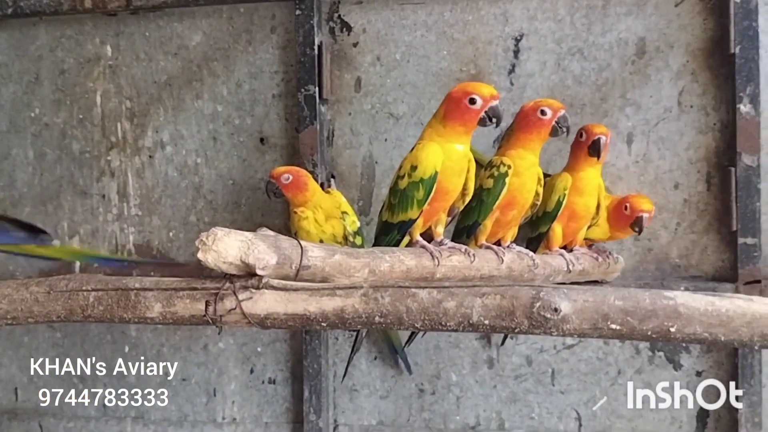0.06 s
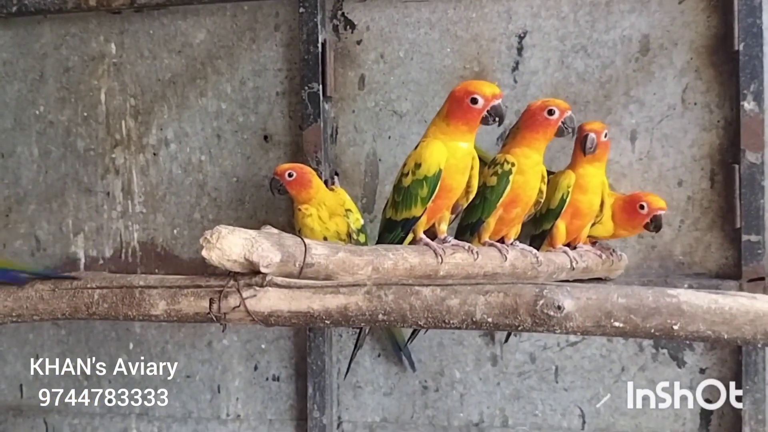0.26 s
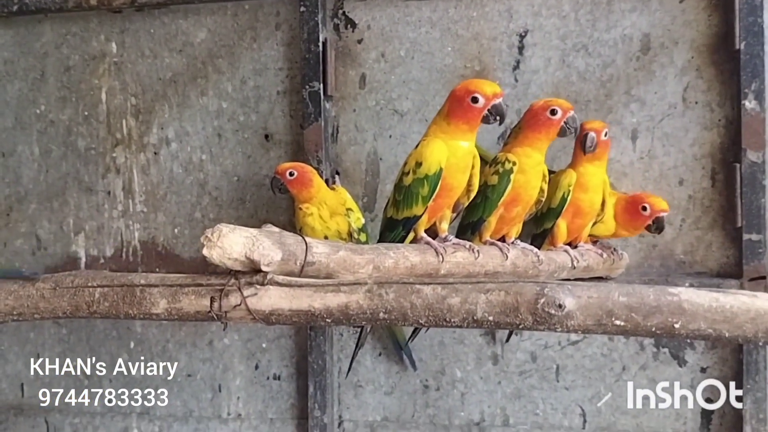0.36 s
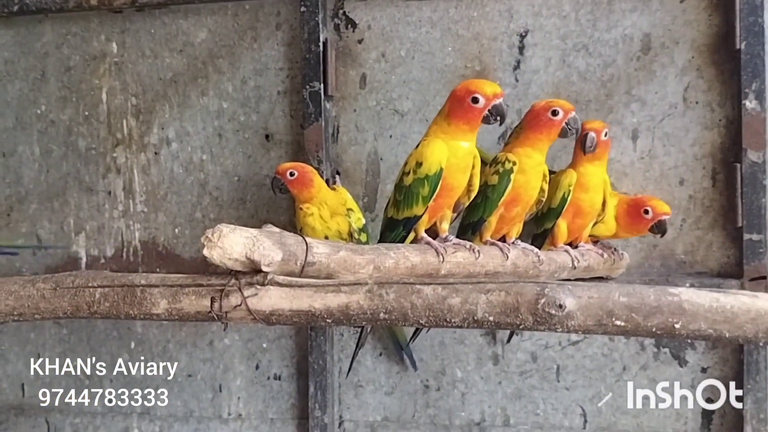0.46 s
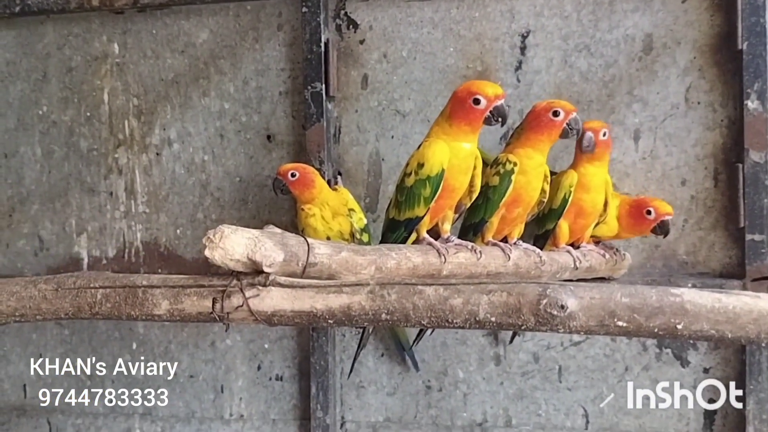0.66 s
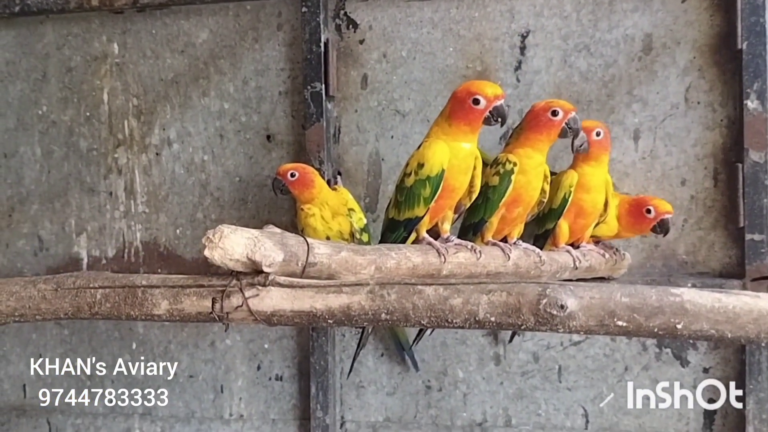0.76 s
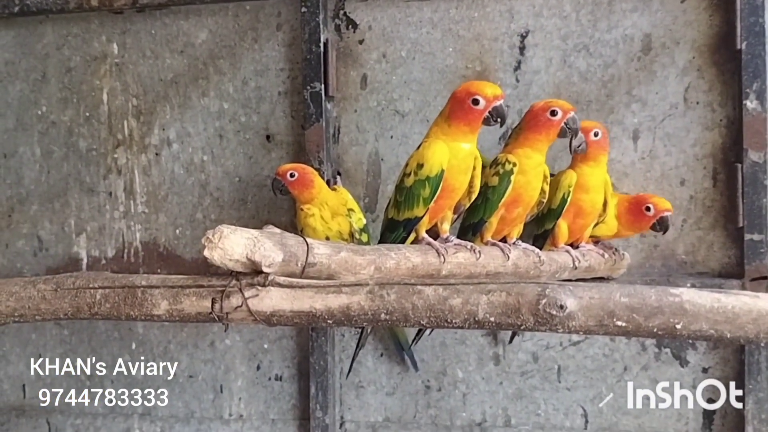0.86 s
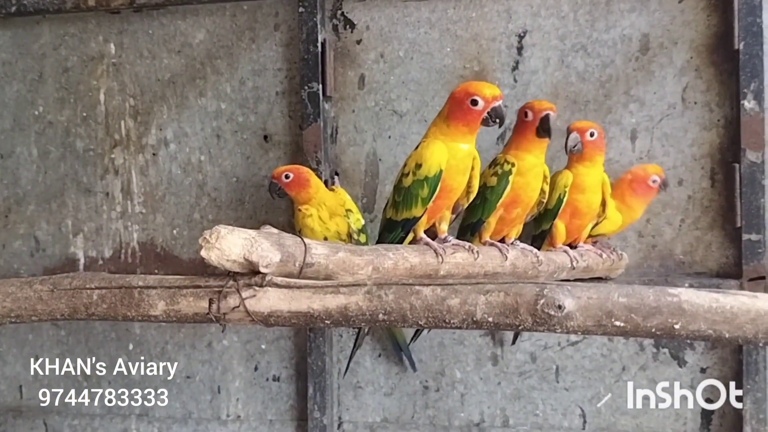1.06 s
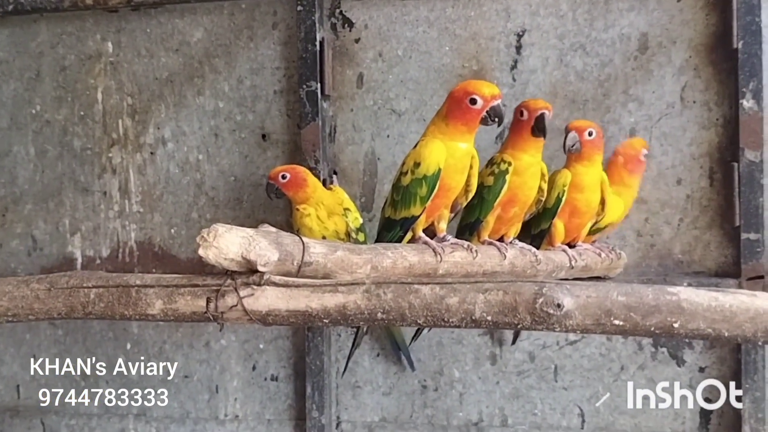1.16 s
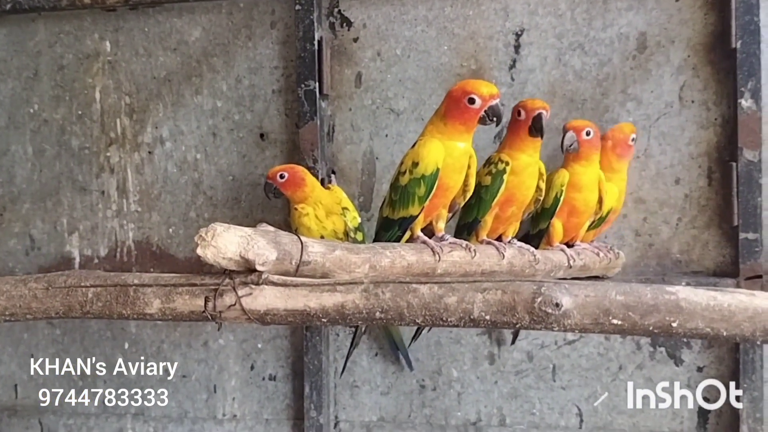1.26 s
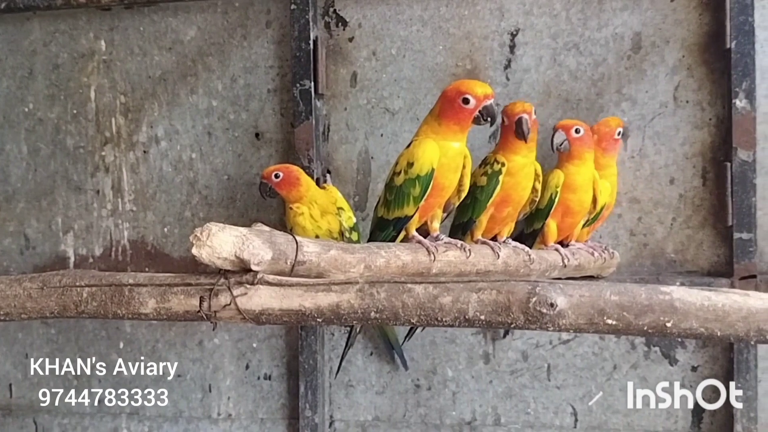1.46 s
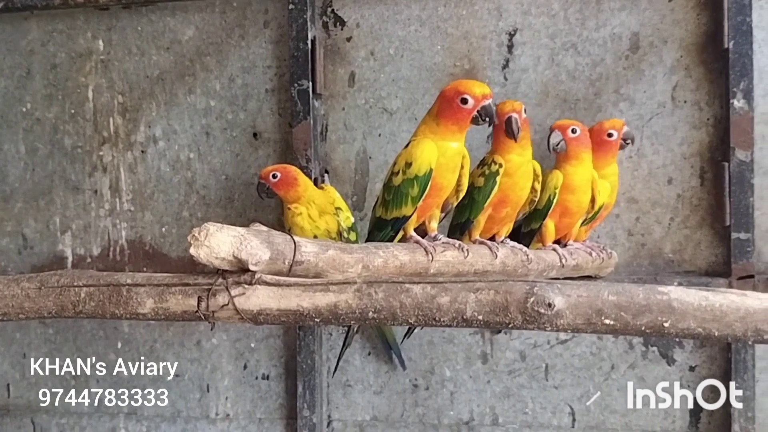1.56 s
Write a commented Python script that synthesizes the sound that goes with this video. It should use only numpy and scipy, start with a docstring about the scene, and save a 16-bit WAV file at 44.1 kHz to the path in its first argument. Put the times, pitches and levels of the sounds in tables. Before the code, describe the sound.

Small parrots call shrilly, one rasping into a piercing shriek, then trilling and chattering, walls ringing

```python
"""In a hard-walled aviary, parrots call: a harsh rasp breaks into a clear shriek, then come a trilled
screech and a short chatter. Birds farther off squawk at the start and towards the end.
Each voice is an unsteady reed-like tone with pulsed, raspy noise, shaped by the throat.
Noise bursts with a decay make the walls ring after every cry, over a low hum and filtered-noise rumble."""
import sys
import numpy as np
from scipy import signal
from scipy.fft import rfft, irfft, next_fast_len
from scipy.io import wavfile
from scipy.ndimage import uniform_filter1d, minimum_filter1d, map_coordinates

SR = 44100
rng = np.random.default_rng(int(sys.argv[2]) if len(sys.argv) > 2 else 0)


def put_to_file(sound):
    """Save the sound as 16-bit audio at rate SR, in the file named by the first command-line argument."""
    columns = np.atleast_2d(sound).T  # one column per channel
    safe = np.clip(columns, -1, 1)
    whole_steps = np.round(safe * 32767)
    wavfile.write(sys.argv[1], SR, whole_steps.astype(np.int16))


N = 72765

# Random turns a second of pitch, level, each harmonic, and the slower clumps and quaver
JITTER_RATE, GRIT_RATE, FUZZ_RATE, CLUMP_RATE = 800, 550, 450, 240
TOP_HZ = 15750  # upper limit of the harmonics and of the whole scene


def amp(db):
    """Decibels to gain."""
    return 10 ** (np.asarray(db) / 20)


def unit(x):
    """Scale to rms 1."""
    return x / np.sqrt(np.mean(x ** 2) + 1e-20)


def along(points, hz):
    """Read (Hz, value) points on a log frequency axis."""
    f, v = np.transpose(points)
    return np.interp(np.log(hz + 1), np.log(f + 1), v)


def clock():
    """Time of each sample in seconds."""
    return np.arange(N) / SR


def wobble(rate):
    """A smooth random curve, rate knots a second."""
    return map_coordinates(rng.standard_normal(N // 20), [clock() * rate], mode="wrap")


def filtered(x, response):
    """Filter x by a response given as a function of frequency."""
    m = next_fast_len(N + SR // 4)
    spectrum = rfft(x, m) * response(np.fft.rfftfreq(m, 1 / SR))
    return irfft(spectrum, m)[..., :N]


def gesture(rows, edge_s=0.0054):
    """Pitch and gain curves of a cry, with a short fade outside each end."""
    start_s, pitch_hz, level_db = np.transpose(rows)
    t = clock()
    gate = np.clip(np.minimum(t - start_s[0], start_s[-1] - t) / edge_s + 1, 0, 1)
    return np.interp(t, start_s, pitch_hz), gate * amp(np.interp(t, start_s, level_db))


def voice(hz, gain, throat, jitter, fuzz, halves_db, rasp_db, grit_db):
    """Jittery, fuzzy harmonics, lines halfway between and pulsed noise; the throat glides with pitch."""
    low_edge = 0.62  # sound well below this share of the mean pitch is cut steeply
    centre = np.average(hz, weights=gain ** 2)
    phase = 2 * np.pi * np.cumsum(centre * (1 + jitter * wobble(JITTER_RATE))) / SR
    tone = np.zeros(N)
    for k in np.arange(1, TOP_HZ / centre, .5):
        size = amp(halves_db) * wobble(FUZZ_RATE) if k % 1 else 1
        tone += size * np.cos(k * phase + fuzz * wobble(FUZZ_RATE))
    # Noise puffs at half the pitch
    air = unit(rng.standard_normal(N) * (1 + np.cos(phase / 2)) ** 2)
    mix = (unit(tone) + amp(rasp_db) * air) / np.sqrt(1 + amp(rasp_db) ** 2)
    source = mix * amp(grit_db * wobble(GRIT_RATE))

    def throat_gain(f):
        low_cut = 1 - 1 / (1 + (f / (low_edge * centre)) ** 8)
        return amp(along(throat, f)) * low_cut

    steady = filtered(source, throat_gain)
    # Reading faster or slower bends pitch and throat together
    glide = np.cumsum((hz / centre - 1) * (gain > gain.max() / 20))
    sound = map_coordinates(steady, [np.arange(N) + glide], mode="nearest")
    return unit(sound * gain) * np.sqrt(np.mean(gain ** 2))


def undertone(rows, rate=GRIT_RATE):
    """A fuzzy gliding line; a faster rate of random turns widens it."""
    hz, gain = gesture(rows)
    carrier = np.exp(2j * np.pi * np.cumsum(hz) / SR)
    band = (wobble(rate) + 1j * wobble(rate)) * carrier
    return gain * unit(band.real)


def aviary(x, pan_db, lag_ms=0.3126, far_db=0):
    """Direct sound at two ports, a burst of near reflections and the ring of the enclosure."""
    # Decay of the ring: pitch_hz, t60_s
    ring = [(500, 1), (2000, 0.64), (5000, 0.42), (15000, 0.32)]
    early_t60_s, wall_delay_s = .035, .0006
    early_db, tail_db = 3, -5
    hz, t, z = signal.stft(rng.standard_normal((2, SR)), SR, nperseg=256)
    decay = amp(-60 * t / along(ring, hz)[:, None])
    tail = signal.istft(z * decay, SR, nperseg=256)[1]
    age = np.arange(tail.shape[1]) / SR
    # Cubed noise is spiky, like separate reflections
    early = rng.standard_normal(tail.shape) ** 3 * amp(-60 * age / early_t60_s)
    walls = 0
    for part, db in ((early, early_db), (tail, tail_db + far_db)):
        part = part * np.clip(age / wall_delay_s - 1, 0, 1)
        walls = walls + amp(db) * part / np.linalg.norm(part, axis=1, keepdims=True)
    sides = np.array([[1], [-1]])  # left, right
    # The left port hears the direct sound first, by lag_ms
    direct = filtered(x, lambda f: np.exp(sides * 1j * np.pi * f * lag_ms / 1000))
    reflected = signal.fftconvolve(x[None], walls, axes=1)[:, :N]
    return amp(sides * pan_db / 2) * (direct + reflected) / np.sqrt(1 + amp(early_db) ** 2)


def far_birds():
    """Hoarse, fluttering squawks heard mostly by way of the walls."""
    # Pitch and level curves ahead of flutter and walls: start_s, pitch_hz, level_db
    first_squawk = [(0, 1815, -27.5), (.045, 1777, -36)]
    last_squawk = [(1.441, 1051, -41), (1.5, 1092, -41), (1.538, 1151, -35.5), (1.612, 1058, -38.5),
                   (1.65, 1051, -58.5)]
    faint_squawk = [(1.345, 1430, -51), (1.411, 1355, -58.5)]
    # Throat colour: pitch_hz, level_db
    throat = [(400, -53), (966, -8), (1780, -11), (2500, 1), (5300, -1.5), (6200, -16.5), (7200, -10.5),
              (15500, -38.5)]
    out = 0
    for rows in (first_squawk, last_squawk, faint_squawk):
        hz, gain = gesture(rows)
        flutter = amp(2.6 * wobble(120))
        cry = voice(hz, gain * flutter, throat, jitter=.05, fuzz=1,
                    halves_db=-3, rasp_db=0, grit_db=3)
        out = out + aviary(cry, pan_db=-3, far_db=11.0)
    return out


def background():
    """Low rumble with a little hiss from filtered noise, and a sine hum that comes and goes."""
    # Noise colour: pitch_hz, level_db
    floor = [(25, -12.5), (140, 1), (230, -5.5), (330, -13.5), (600, -19), (2400, -21), (15000, -37.5)]
    # Hum level curve: start_s, level_db
    hum_curve = [(.15, -52.5), (.88, -56), (1.2, -90), (1.552, -52.5)]
    hum_hz, floor_db, floor_side_db = 89.5, -51.5, -12
    noise = rng.standard_normal((2, N))
    mid, side = unit(filtered(noise, lambda f: amp(along(floor, f))))
    side = amp(floor_side_db) * side
    hum_gain = amp(np.interp(clock(), *np.transpose(hum_curve)))
    hum = np.sqrt(2) * hum_gain * np.sin(2 * np.pi * hum_hz * clock())
    return amp(floor_db) * np.array([mid + side, mid - side]) + hum


def rasp():
    """A harsh cry in gritty clumps that swells and catches, its lower resonance rising with the effort."""
    # Cry, gliding lower resonance and hoarse undertone, ahead of the final trim:
    # start_s, pitch_hz (centre for the resonance), level_db
    cry_curve = [(.183, 1488, -29.5), (.192, 1510, -25), (.215, 1521, -29.5), (.275, 1540, -22),
                 (.308, 1697, -17.5), (.333, 1630, -23.5), (.341, 1600, -28.5), (.355, 1698, -21),
                 (.382, 1599, -24.5), (.398, 1479, -32), (.414, 1485, -35.5), (.417, 1515, -19.5),
                 (.438, 1598, -26)]
    resonance = [(.185, 2097, -33.5), (.25, 2600, -34.5), (.31, 3250, -26.5), (.37, 3100, -30),
                 (.405, 2600, -30)]
    under = [(.175, 880, -44.5), (.25, 860, -42.5), (.305, 1600, -37.5), (.395, 950, -46.5),
             (.44, 1500, -36.5)]
    # Throat colour: pitch_hz, level_db
    throat = [(530, -38), (900, -13), (1500, -9.5), (2400, -0.5), (3500, -5), (4750, 5.5), (5770, -12),
              (6700, -4.5), (7860, -14.5), (9290, -17.5), (15500, -37)]
    clump_db = 2.5
    hz, gain = gesture(cry_curve)
    cry = voice(hz, gain, throat, jitter=.04, fuzz=1, halves_db=-4, rasp_db=0, grit_db=3)
    clumps = unit(amp(clump_db * wobble(CLUMP_RATE)))
    clumped = (cry + undertone(resonance, JITTER_RATE)) * clumps
    return amp(3.5) * aviary(clumped + undertone(under), pan_db=2.0)


def shriek():
    """The voice locks into a clear, quavering arched tone, then cracks into noise as it ends."""
    # Cry ahead of the final trim: start_s, pitch_hz, level_db
    cry_curve = [(.44, 1821, -22.5), (.457, 1904, -13.5), (.478, 2043, -14.5), (.498, 1987, -11.5),
                 (.51, 1868, -12.5), (.52, 1939, -19)]
    # Throat colour: pitch_hz, level_db
    throat = [(1950, -13.5), (3000, -6.5), (3950, -1), (5800, -8.5), (7700, -15.5), (9700, -18.5),
              (12500, -33.5), (15300, -31)]
    break_s, break_fade_s = .512, 0.005
    hz, gain = gesture(cry_curve)
    crack = np.clip((clock() - break_s) / break_fade_s + .5, 0, 1)
    hz = hz * (1 + .022 * wobble(CLUMP_RATE))  # quaver
    cry = voice(hz, gain, throat, jitter=.02 + .04 * crack, fuzz=.36,
                halves_db=-22 + 18 * crack, rasp_db=-14 + 13 * crack, grit_db=2.8)
    return amp(3.5) * aviary(cry, pan_db=0.5, lag_ms=0.1, far_db=0.5)


def screech():
    """Level and pitch beat together in a fast trill that slows, ending on a whistle."""
    # Cry and hoarse undertone, ahead of trill and trim: start_s, pitch_hz, level_db
    cry_curve = [(.741, 962.7, -29), (.767, 996.7, -17.5), (.82, 1050, -13), (.875, 1055, -11.5),
                 (.9, 1010, -13), (.938, 940, -19.5)]
    under = [(.74, 799.5, -45), (.78, 1250, -35), (.86, 2075, -27), (.94, 1406, -37)]
    # Throat colour: pitch_hz, level_db
    throat = [(600, -13), (1000, -35), (1990, -12.5), (2600, -8.5), (3110, -2.5), (4100, 0), (5300, -2.5),
              (6400, -5), (8600, -15.5), (9700, -15), (11500, -25), (15500, -29.5)]
    trill_hz, trill_slows_hz_per_s, trill_peak_s = 77.2, 97, .8285  # rate at the peak
    whistle_s, whistle_db, whistle_rise_db_per_s = .94, -23, 250
    hz, gain = gesture(cry_curve)
    t = clock() - trill_peak_s
    beat = 2 * np.pi * (trill_hz * t - trill_slows_hz_per_s * t * t / 2)
    hoarse = np.clip(-t / t[gain > 0].max(), 0, 1)  # rough at first, clearing towards the peak
    sweep = 1 + .03 * np.sin(beat)
    pulses = unit(amp(10 * np.cos(beat)))
    cry = voice(hz * sweep, gain * pulses, throat, jitter=.014 + .08 * hoarse, fuzz=.6,
                halves_db=-5, rasp_db=-8 + 20 * hoarse, grit_db=2)
    distance_s = np.abs(clock() - whistle_s)
    whistle_gain = (gain > 0) * amp(whistle_db - whistle_rise_db_per_s * distance_s)
    # The whistle follows three times the cry's pitch
    whistle = whistle_gain * np.sqrt(2) * np.sin(2 * np.pi * np.cumsum(3 * hz) / SR)
    return aviary(amp(1.0) * cry + whistle + undertone(under), pan_db=-0.5)


def chatter():
    """A quick run of short bell-shaped notes, each arching in pitch."""
    # Notes ahead of the final trim: centre_s, level_db
    note_rows = [(1.040, -23.5), (1.063, -27), (1.085, -20.5), (1.105, -18), (1.126, -19.5), (1.141, -21),
                 (1.158, -27)]
    # Hoarse undertone of the first note, ahead of the trim: start_s, pitch_hz, level_db
    under = [(1.036, 1000, -40), (1.047, 990, -42)]
    # Throat colour: pitch_hz, level_db
    throat = [(1100, -8), (1800, -11), (2500, 3), (3400, -4.5), (4600, -2), (5500, -15), (6250, -7.5),
              (7400, -29), (9490, -21.5), (13800, -62)]
    note_width_s, note_top_hz, note_arch_hz = 0.0046, 1570, 109.1
    centre_s, level_db = np.transpose(note_rows)
    notes = np.exp(-((clock() - centre_s[:, None]) / note_width_s) ** 2 / 2)
    pitch = note_top_hz + note_arch_hz * (notes.max(axis=0) - 1)
    cry = voice(pitch, amp(level_db) @ notes, throat, jitter=.03, fuzz=.7,
                halves_db=-3, rasp_db=-2, grit_db=2)
    return amp(1.0) * aviary(cry + undertone(under), pan_db=-1.0)


def scene():
    """All the birds, coloured differently at each port, over the background."""
    # Colour difference of the ports: pitch_hz, left_minus_right_db
    ports = [(500, -1.5), (2300, 0.5), (4400, 4), (7000, 6.5), (9500, -9), (15000, -8.5)]
    birds = rasp() + shriek() + screech() + chatter() + far_birds()
    halves = np.array([[.5], [-.5]])
    return filtered(birds, lambda f: amp(halves * along(ports, f))) + background()


def record(dry):
    """A fast peak limiter, its gain shared by both ports, and the band limit."""
    ceiling, limiter_s = .97, .003
    size = int(limiter_s * SR)
    needed = ceiling / np.maximum(np.abs(dry).max(axis=0), ceiling)
    gain = uniform_filter1d(minimum_filter1d(needed, 2 * size + 1), size)
    return filtered(dry * gain, lambda f: f < TOP_HZ)


dry = scene()
out = record(dry)
put_to_file(out)
```